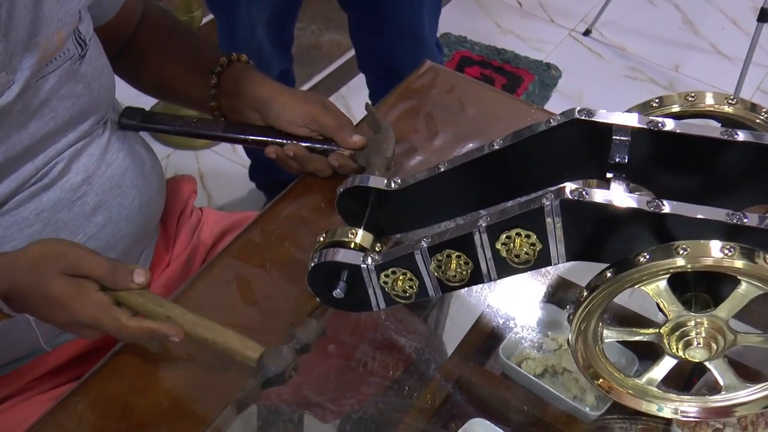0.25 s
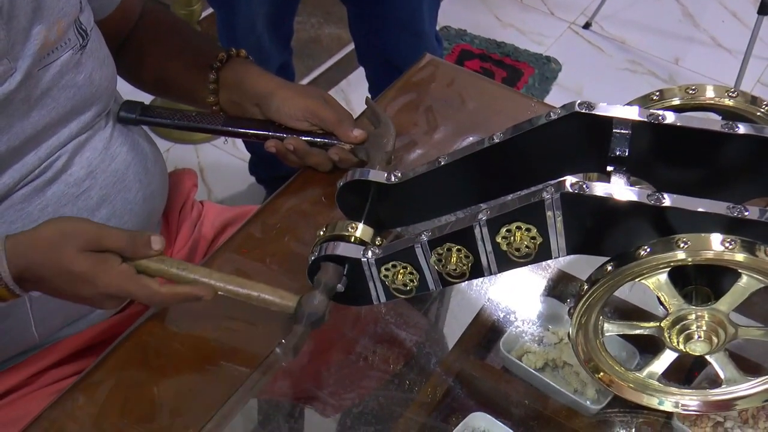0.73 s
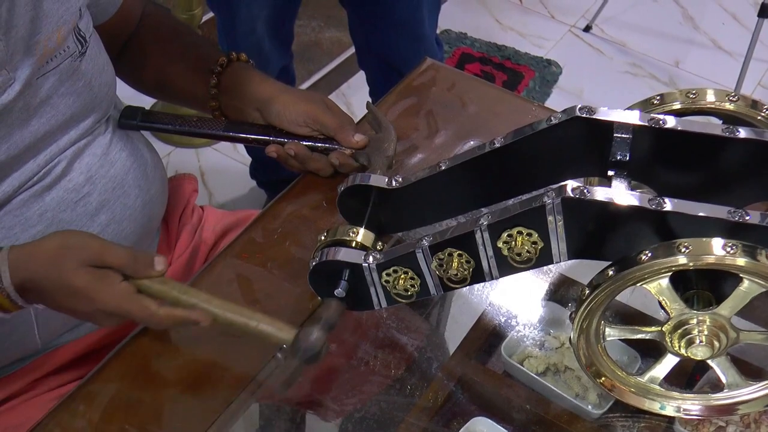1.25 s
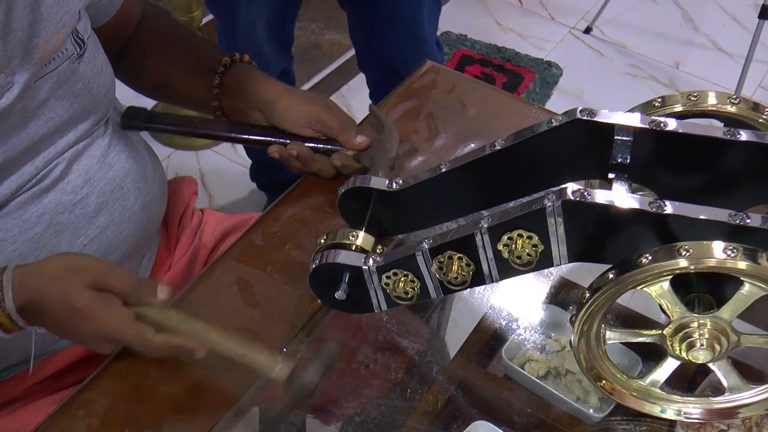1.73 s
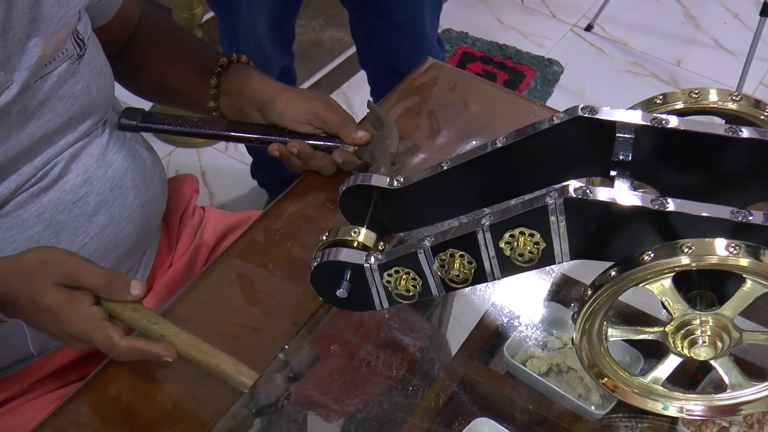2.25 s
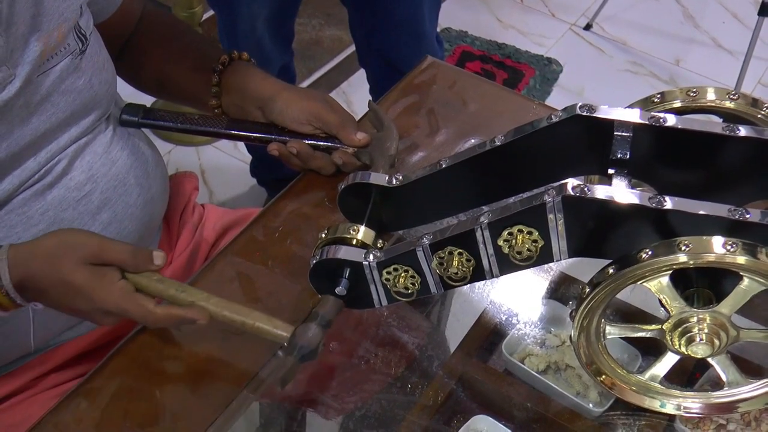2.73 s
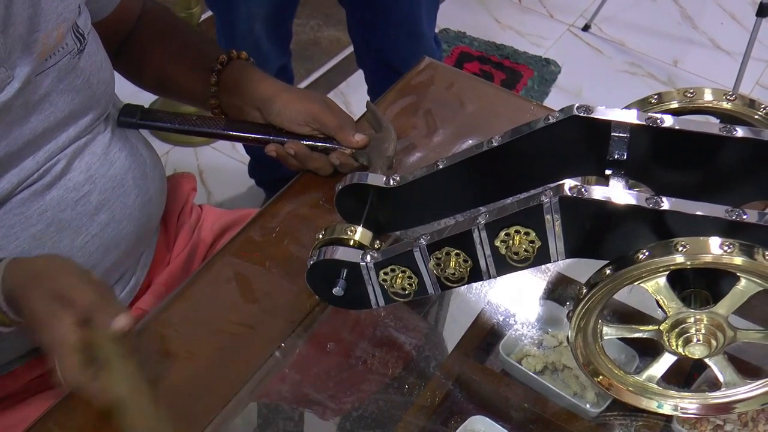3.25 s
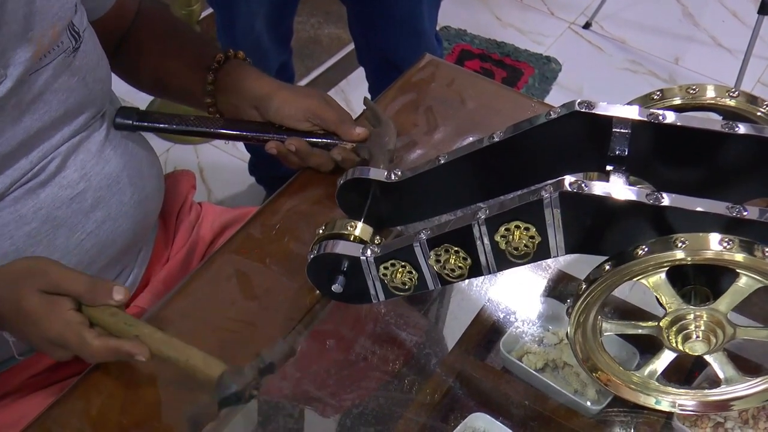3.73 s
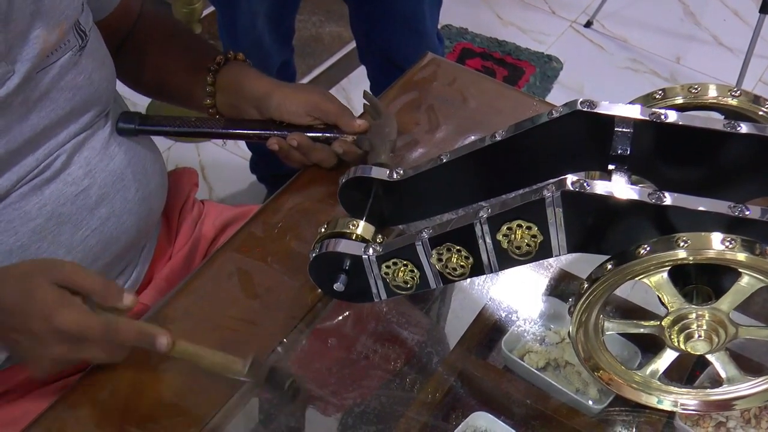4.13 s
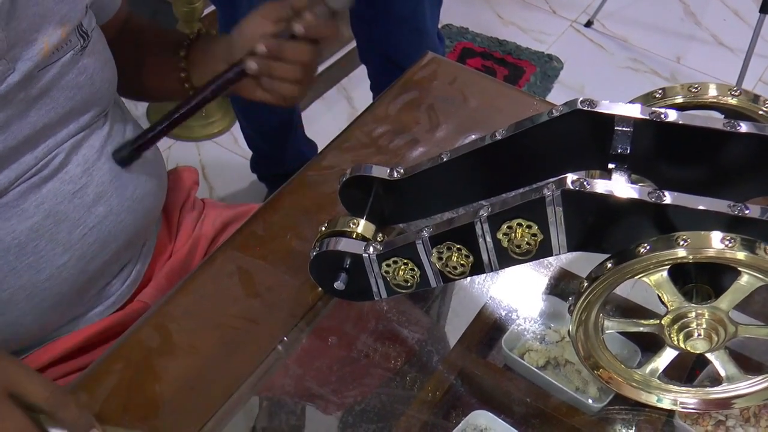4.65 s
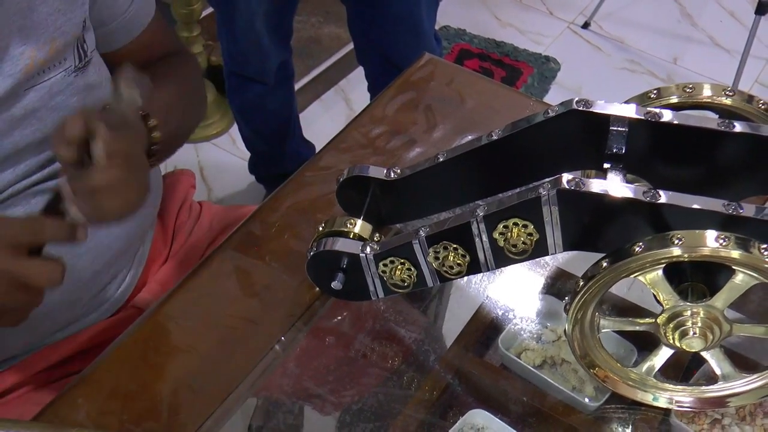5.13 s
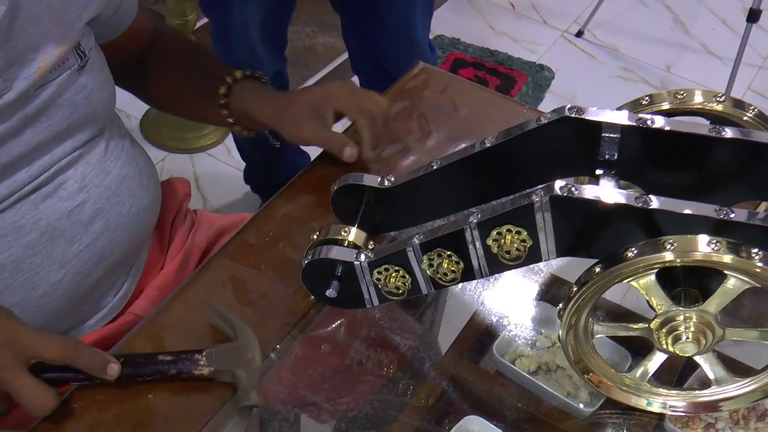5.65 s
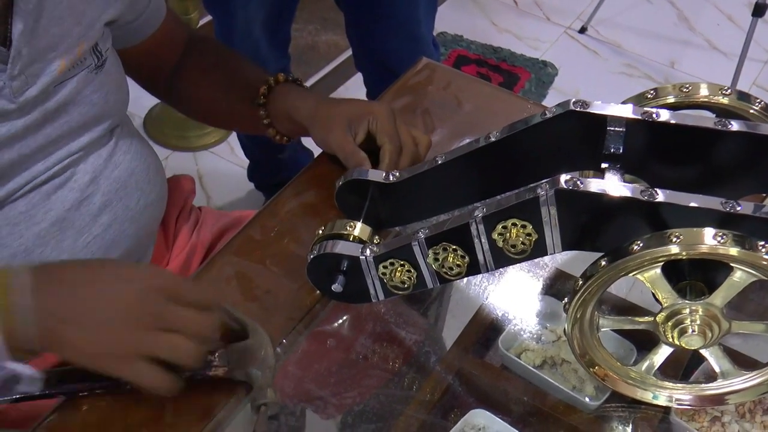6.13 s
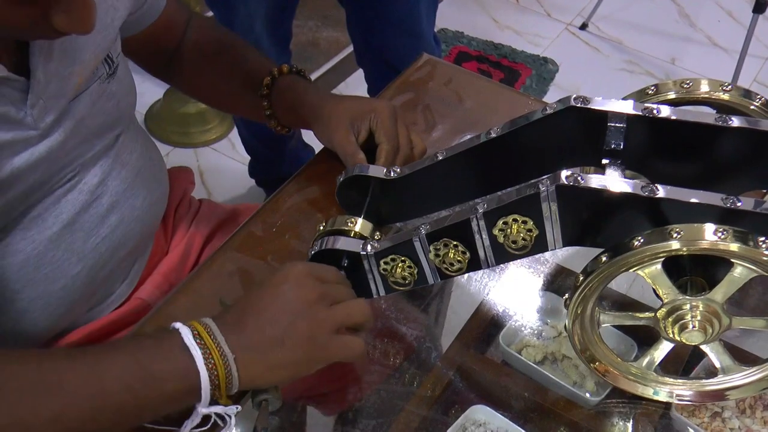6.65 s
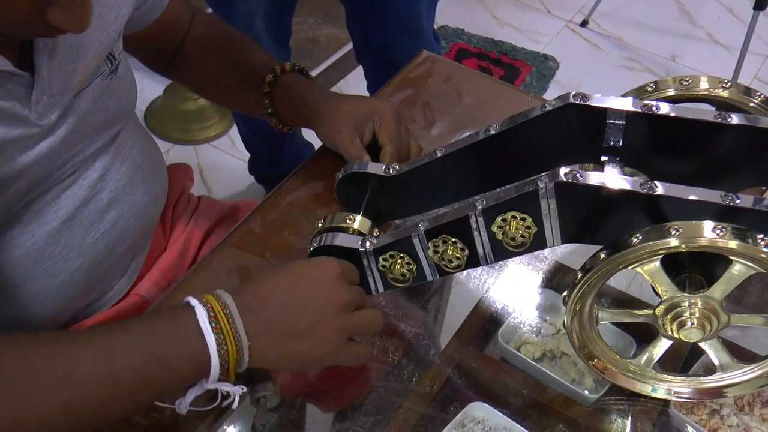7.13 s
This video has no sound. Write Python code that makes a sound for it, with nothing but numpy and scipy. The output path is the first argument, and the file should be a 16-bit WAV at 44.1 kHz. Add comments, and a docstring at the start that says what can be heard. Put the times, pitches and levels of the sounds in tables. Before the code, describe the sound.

Uneven hammering on a small metal pin, faint taps between piercing blows that ring through the room, followed by hammers knocking onto a tabletop.

```python
"""A hammer cracks on a brass pin, driven into the wooden carriage of a model cannon in a bare, tiled room.
Light aiming taps and three hard blows ring steel modes, a loose cap and the carriage's modes and dense noise.
Then the hammers are put down on the table, one after the other, and rock to rest: knocks that ring the top.
Loose metal ticks, hands and sleeves rustle as swells of noise, over a faint room hiss and a brief hum.
The camera's limiter holds down the hard blows, whose first instant overloads it."""
import sys
import numpy as np
from scipy import signal
from scipy.fft import rfft, irfft, next_fast_len
from scipy.io import wavfile
from scipy.ndimage import uniform_filter1d, map_coordinates

SR = 44100
rng = np.random.default_rng(int(sys.argv[2]) if len(sys.argv) > 2 else 0)


def transcribe(u):
    """Save the signal u as a 16-bit wav file named by the first command-line argument.

    u: samples, shape (n,) or (channels, n), limited to [-1, 1]; the rate is SR.
    q: integer samples, one column per channel.
    """
    v = np.clip(np.atleast_2d(u).T, -1, 1)
    q = np.round(v * 32767).astype(np.int16)
    wavfile.write(sys.argv[1], SR, q)


N = 325889
T = np.arange(SR) / SR  # one second after a contact
HZ = np.fft.rfftfreq(SR, 1 / SR)

# stereo width at the microphone, narrow bass to wide treble: (frequency [Hz], side minus mid [dB])
STEREO_WIDTH = [(100, -26), (600, -21.5), (1300, -13.5), (2400, -8), (4400, -2), (8000, -3), (15000, 6)]


def hammering():
    """Steel pings on the pin, its cap clinks, the carriage takes the blow, and overload adds a slow push."""
    # hammer blows on the pin:
    # (time [s], force [dB], squareness of the aim [dB], loose cap's clink relative to force [dB])
    blows = [(0.0104, -1.5, -5.5, -35), (0.5853, -42.5, -12, -43), (0.8111, -23, -24, -41),
             (1.4029, -30, 2.5, -26), (1.7388, 2.5, -6.5, -37), (2.8203, -44.5, -9, -30),
             (3.008, -33, 2, -21.5), (3.412, 3, -1, -59)]
    # modes of the loose brass cap around the pin: (frequency [Hz], relative level [dB], t60 [s])
    cap_modes = [(2470, 1.5, 0.27), (2576, 0, .24), (3020, 2, .12), (3680, -1.5, 0.12), (3960, -2, .12),
                 (6260, -10.5, 1), (6390, -6.5, .35), (7420, -4.5, .3), (7870, -7, .3)]
    # modes of the carriage with its brass fittings: (frequency [Hz], relative level [dB], t60 [s])
    carriage_modes = [(110, 9.5, 0.15), (341.3, -0.5, .7), (402.6, 1.5, 0.48), (432.5, -2, 0.48),
                      (554, 1.5, 0.65), (752.6, -10, 0.9), (874, -18.5, 0.25), (1011, -10.5, 0.71),
                      (1316, -3, 0.88), (1530, -5.5, 0.79), (1914, -4.5, 0.36), (2343, 1.5, 0.36),
                      (2565, -1, 0.61), (3520, -12, 0.89), (5150, 1.5, .55), (5920, 2.5, .4),
                      (8200, -1, .55), (14600, 8, .3)]
    glance_short = 0.2  # dB of short ring gained per dB of glance
    push_db, push_s = -18.5, 0.03  # the overload's sub-bass push: relative level, time scale
    push_sides = [[0.25], [1.5]]  # left and right gain
    track, pushes = np.zeros((2, 2, N))
    for s, force_db, square_db, clink_db in blows:
        gain = tap_colour(force_db, square_db)
        ping_db = force_db + square_db

        ping = amp(ping_db) * ring(woken(force_db), scatter_db=1, waver=0, spread=0.4)
        contact = ping + amp(13) * crack(gain, t60=0.012)
        cap = amp(force_db + clink_db) * ring(cap_modes, scatter_db=1.5, waver=0.4)
        wood = amp(-20) * ring(driven(carriage_modes, gain), scatter_db=1.5, waver=0.35)
        short_db = 9 + glance_short * glance(square_db)
        dense = amp(-1.0) * dense_ring(gain, short_db, short_t60=0.13, attack=0.002)
        add(track, s, reflected(contact, echo_db=-22))
        add(track, s, cap + wood + dense)

        # a slow sub-bass push from the recorder's overload, heard only on the strongest square blows
        u = T / push_s
        push = (1 - u / 2) * np.exp(-u) * (1 - np.exp(-T / 0.004))
        add(pushes, s, -amp(push_db + 2 * ping_db) * push)
    return radiated(track) + pushes * push_sides


def tap_colour(force_db, square_db):
    """Light taps are mostly thud; a square blow sizzles, a glancing one thumps and clacks on the fittings."""
    # spectrum of the carriage's dense ring: (frequency [Hz], relative level [dB])
    carriage_body = [(70, -24), (110, -9), (145, -16.5), (230, -4.5), (380, -5), (600, -7), (1000, -8),
                     (2400, -8.5), (3300, -13.5), (4300, -23), (5500, -21.5), (7700, -19), (10500, -31.5),
                     (15500, -38)]
    thud_db, thud_loss, glance_thud = -3, 0.2, 0.15  # full blow; dB lost per dB of force, gained per dB of glance
    clack_db, glance_clack = -3, 0.95  # square blow; dB gained per dB of glance
    sizzle_db, square_sizzle, glance_sizzle = -2.2, 0.3, 0.46  # treble; dB per dB of squareness and of glance
    glance_db = glance(square_db)
    thud = thud_db - thud_loss * force_db + glance_thud * glance_db
    clack = clack_db + glance_clack * glance_db
    sizzle = sizzle_db + square_sizzle * square_db + glance_sizzle * glance_db
    lean = along([(360, thud), (520, 0.0061), (800, 0.0069),
                  (1250, clack), (2300, clack), (4300, sizzle)], HZ)
    return amp(force_db + along(carriage_body, HZ) + lean)


def glance(square_db):
    """How far a blow falls below the squareness at which it starts to glance, in dB."""
    return max(0, -13 - square_db)


def woken(force_db):
    """A light tap stays longer on the pin and wakes less of its top."""
    # hammer head and pin, damped at once by the wood:
    # (frequency [Hz], relative level before the force's effect on the top [dB], t60 [s])
    steel_modes = [(7150, -6.5, .014), (7300, -11.5, 0.0057), (7640, 1, 0.0092), (8340, -12, 0.011),
                   (9100, -11.5, .018), (13000, -14, .009), (13440, -12, 0.011)]
    ping_hz, dulling = 7600, 0.22  # above this, dB per octave and per dB of force
    return [(hz, db + dulling * force_db * max(0, np.log2(hz / ping_hz)), t60)
            for hz, db, t60 in steel_modes]


def putting_down():
    """Head and handle of each hammer land on the tabletop and rock."""
    # hammers and hands landing on the table: (time [s], force [dB], contact time [ms])
    landings = [(4.5896, -9.5, 0.46), (4.6018, -4, 0.16), (4.716, -13, 0.99), (4.803, -17.5, 0.7),
                (5.5574, -19, 1.5), (5.566, -19.5, 1.95), (5.7157, -7, 0.14), (5.9256, -16.5, 0.75),
                (5.94, -11, 4), (6.879, -39, 1.17)]
    # modes of the tabletop: (frequency [Hz], relative level [dB], t60 [s])
    table_modes = [(113, 1, .8), (245, -3, .55), (300, -2, .5), (398, -2, .6), (540, -3, .35), (579, 0, .4),
                   (610, 1, .15), (695, -1, .45), (770, -3, .25), (1098, -6, .3), (1585, -2, .45),
                   (1980, -1, .45), (2304, -1, .5), (3038, -1, .45)]
    track = np.zeros((2, N))
    for s, force_db, contact_ms in landings:
        gain = knock_colour(force_db, contact_ms)
        contact = reflected(crack(gain, t60=0.0043), echo_db=-14.5)
        top = amp(-21) * ring(driven(table_modes, gain), scatter_db=1.5, waver=0.35)
        dense = amp(-3.5) * dense_ring(gain, short_db=8, short_t60=0.15, attack=0.00033)
        add(track, s, contact + top + dense)
    return radiated(track)


def knock_colour(force_db, contact_ms):
    """The longer a contact lasts, the less treble it wakes: steel is brief, a wooden handle slow."""
    # spectrum of the tabletop's dense ring: (frequency [Hz], relative level [dB])
    table_body = [(70, -32.5), (110, -15.5), (150, -15), (230, -7.5), (330, -4), (650, 3), (1000, -1),
                  (2000, -7), (3200, -10.5), (4400, -21), (6000, -23), (8500, -30.5), (11000, -40),
                  (15500, -50)]
    hard_db_per_octave, hard_from_hz = 3.5, 750  # treble lift of an instant contact
    soft_slope = 3.5  # power of a long contact's roll-off
    hard = hard_db_per_octave * np.log2(np.maximum(HZ / hard_from_hz, 1))
    cycles = HZ * contact_ms / 1000
    return amp(force_db + along(table_body, HZ) + hard) / np.sqrt(1 + cycles ** soft_slope)


def ticks():
    """Tiny bright clicks of loose metal: short noise bursts with early returns."""
    # small loose bits of metal ticking: (time [s], relative level [dB])
    loose_bits = [(3.483, -47), (3.779, -67), (6.017, -62)]
    track = np.zeros((2, N))
    gain = amp(along([(2000, -25), (6000, 22), (11000, 9), (15000, 2)], HZ))
    for s, db in loose_bits:
        add(track, s, amp(db + 7) * reflected(crack(gain, t60=0.012), echo_db=-18))
    return track


def rustles():
    """Soft swells of skin and cloth sliding, and a thin shifting hiss while the hands work."""
    # hands and sleeves: (middle [s], time from the middle to 1/e [s], level [dB], centre [Hz])
    swells = [(2.495, 0.28, -65, 1810), (2.55, 0.056, -60.5, 250), (2.727, 0.093, -60, 250),
              (2.872, 0.036, -57, 198), (4.523, 0.079, -60, 2500), (5.083, .12, -54, 2600),
              (5.456, .14, -65, 1970), (6.756, 0.064, -63, 2090)]
    # thin hiss of cloth against the arms: (time [s], level [dB])
    cloth_level = [(.6, -71.5), (1.1, -92), (1.499, -68), (2.4, -71.5), (2.95, -77.5), (3.19, -66.5),
                   (3.35, -77), (3.749, -67.5), (4.2, -79), (5.7, -79), (6.04, -67), (6.17, -76),
                   (6.6, -80), (7.2, -85.5)]
    track = np.zeros((2, N))
    for s, length, db, centre_hz in swells:
        gain = np.exp(-(np.log2((HZ + 1) / centre_hz) / 1.2) ** 2)
        gain = gain / np.sqrt(np.mean(gain ** 2))
        swell = np.exp(-((T - 0.5) / length) ** 2)
        add(track, s - 0.5, amp(db) * swell * noise(gain, HZ))
    sliding = steady([(4000, -40), (5500, -10.5), (7800, 1), (11500, -11.5), (15500, -25.5)])
    level_db = np.interp(np.arange(N) / SR, *np.transpose(cloth_level))
    return track + amp(level_db) * sliding


def room_hiss():
    """The steady air of the room, and near the end a brief faint hum, which wavers."""
    # spectrum of the quiet room: (frequency [Hz], relative level [dB])
    quiet = [(20, -8), (45, -0.5), (75, -7.5), (115, 1), (150, -3.5), (190, -2), (700, -4.5), (1500, -11),
             (3200, -13.5), (4400, -22), (5600, -21), (7800, -23.5), (11500, -32), (15500, -35)]
    # faint hum that hangs in the room: (frequency [Hz], level about which it wavers [dB])
    hum_tones = [(506.0, -70), (748.3, -63.5)]
    t = np.arange(N) / SR
    hum = sum(amp(db + 3 * wobble(16)) * np.sin(2 * np.pi * hz * t) for hz, db in hum_tones)
    hum_gate = np.interp(t, [6.92, 6.98, 7.28, 7.34], [0, 1, 1, 0])
    return amp(-61.5) * steady(quiet) + hum * hum_gate


def crack(gain, t60):
    """The first instant of a contact: a burst of coloured noise."""
    return noise(gain, HZ) * fade(T, t60) * (1 - np.exp(-T / 0.000067))


def ring(modes, scatter_db, waver, spread=1):
    """Single modes at new strengths for each blow; their echoes make them waver."""
    hz, db, t60 = np.transpose(modes)[:, :, None]
    chance = rng.standard_normal((len(modes), 2))  # strength and starting phase
    knots = rng.standard_normal((2, len(modes), 32))
    drift = signal.resample(knots[0] + 1j * knots[1], 512, axis=1)
    drift = drift[:, np.arange(SR) * drift.shape[1] // SR]
    swing = np.exp(2j * np.pi * (hz * T + chance[:, 1:]))
    swing *= 1 + waver * drift * (1 - fade(T, 0.033))
    swing *= amp(db + scatter_db * chance[:, :1]) * fade(T, t60) * (1 - np.exp(-T * hz / 2))
    # opposite phase shifts left and right give each mode its width
    width = amp(along(STEREO_WIDTH, hz[:, 0]))
    lag = np.exp(1j * spread * width * rng.standard_normal(len(modes)))
    return np.array([lag @ swing, lag.conj() @ swing]).real


def driven(modes, gain):
    """A blow drives each mode as strongly as it drives that mode's neighbours."""
    return [(hz, db + 20 * np.log10(np.interp(hz, HZ, gain)), t60) for hz, db, t60 in modes]


def dense_ring(gain, short_db, short_t60, attack):
    """Countless close modes: a short ring of the object, then the room's slow tail."""
    # reverberation of the tiled room: (frequency [Hz], t60 [s])
    room_decay = [(100, .95), (350, .85), (800, .72), (2500, .68), (6500, .56), (9000, .48), (14000, .4)]
    # colour of the object's own short ring over the room's: (frequency [Hz], relative level [dB])
    early_colour = [(300, -2), (1500, -2.5), (4000, -1), (8000, 1.5), (14000, 0.5)]
    hz, t, z = signal.stft(noise(uneven(gain, depth_db=2.5), HZ), SR, nperseg=256)
    tail = fade(t, along(room_decay, hz)[:, None])
    short = amp(short_db + along(early_colour, hz))[:, None] * fade(t, short_t60)
    sound = signal.istft(z * np.hypot(tail, short), SR, nperseg=256)[1][:, :SR]
    return sound * (1 - np.exp(-T / attack))


def uneven(gain, depth_db, size=90):
    """Each point of contact favours other clusters of modes."""
    ripple = uniform_filter1d(rng.standard_normal(len(HZ)), size) * np.sqrt(size)
    return gain * amp(depth_db * ripple * HZ / (HZ + 1000))


def reflected(sound, echo_db, count=7):
    """A sound from straight ahead, then its first returns from tabletop, floor and walls."""
    out = 0.73 * sound.mean(axis=0) + 0.1 * sound
    delays = rng.uniform(0.0013, 0.034, count)  # seconds
    for delay, sign in zip(delays, rng.choice([-1, 1], count)):
        late = np.pad(sound, ((0, 0), (round(delay * SR), 0)))[:, :SR]
        out += sign * amp(echo_db) * fade(delay, 0.2) * late
    return out


def radiated(track):
    """Objects this small give off little deep bass: a high-pass at 90 Hz."""
    return signal.sosfilt(signal.butter(4, 90, "highpass", fs=SR, output="sos"), track)


def steady(spectrum):
    """Even noise of unit level with the given (Hz, dB) colour."""
    hz = np.fft.rfftfreq(2 * next_fast_len(N // 2 + 1), 1 / SR)
    gain = amp(along(spectrum, hz))
    return noise(gain / np.sqrt(np.mean(gain ** 2)), hz)[:, :N]


def noise(gain, hz):
    """Coloured stereo noise: the bass is shared by both sides, the treble is not."""
    white = rng.standard_normal((2, 2 * (len(hz) - 1)))
    widths = [np.ones_like(hz), amp(along(STEREO_WIDTH, hz))]
    mid, side = irfft(rfft(white) * gain * widths)
    return np.array([mid + side, mid - side])


def wobble(rate):
    """A smooth random curve, rate knots a second."""
    knots = rng.standard_normal(int(N * rate / SR) + 4)
    return map_coordinates(knots, [np.arange(N) * rate / SR])


def amp(db):
    """Decibels to gain."""
    return 10 ** (np.asarray(db) / 20)


def along(points, hz):
    """Interpolate (Hz, value) points on a log frequency axis."""
    f, v = np.transpose(points)
    return np.interp(np.log(hz + 1), np.log(f + 1), v)


def fade(t, t60):
    """A decay that loses 60 dB in t60."""
    return np.exp(-np.log(1000) * t / t60)


def add(track, s, sound):
    """Mix a sound in from time s."""
    start = max(0, round(s * SR))
    track[:, start:start + sound.shape[-1]] += sound[..., :N - start]


def limited(x):
    """The limiter lets the first instant of a blow through, holds down the rest and lets go again."""
    limit_db, sense_s, release_db_per_s = -12, 0.0026, 110  # threshold, reaction time, recovery
    keep = np.exp(-1 / (sense_s * SR))
    power = signal.lfilter([1 - keep], [1, -keep], np.mean(x ** 2, axis=0))
    over_db = np.maximum(10 * np.log10(power + 1e-12) - limit_db, 0)
    recovery_db = release_db_per_s * np.arange(N) / SR
    # the running maximum holds each peak while the recovery ramp lets it go
    return x * amp(recovery_db - np.maximum.accumulate(over_db + recovery_db))


def scene():
    """Everything at the work table, a little to the right."""
    sources = hammering() + putting_down() + ticks() + rustles() + room_hiss()
    return sources * amp([[-0.3], [0.3]])


def record(dry):
    """The camera holds down hard blows, rounds off peaks at full scale and cuts steeply above its band limit."""
    top_hz = 16000
    held = limited(dry)
    clipped = held / (1 + held ** 6) ** (1 / 6)
    size = next_fast_len(N + SR // 2)
    passband = 1 / np.sqrt(1 + (np.fft.rfftfreq(size, 1 / SR) / top_hz) ** 240)
    return irfft(rfft(clipped, size) * passband, size)[:, :N]


dry = scene()
out = record(dry)
transcribe(out)
```